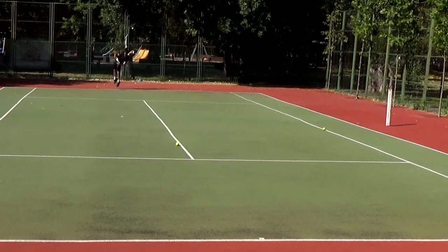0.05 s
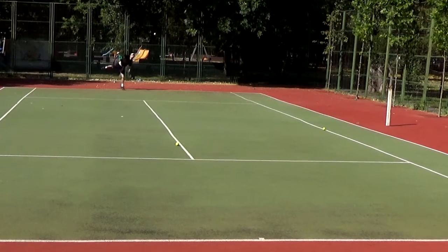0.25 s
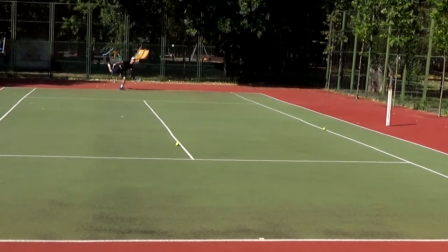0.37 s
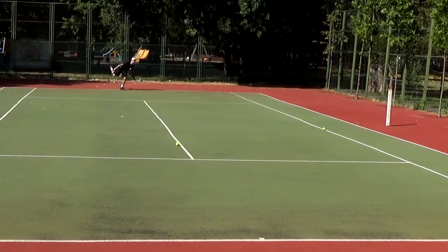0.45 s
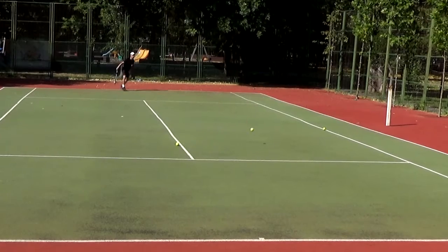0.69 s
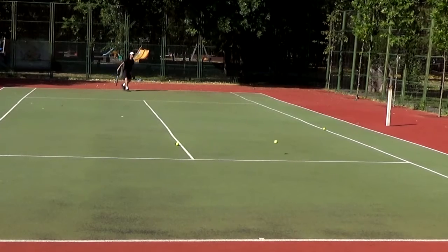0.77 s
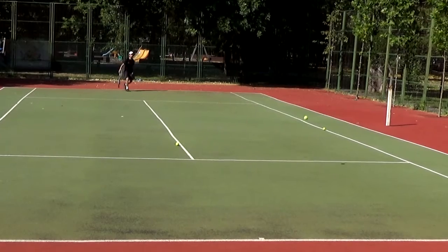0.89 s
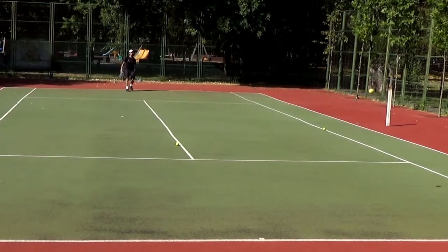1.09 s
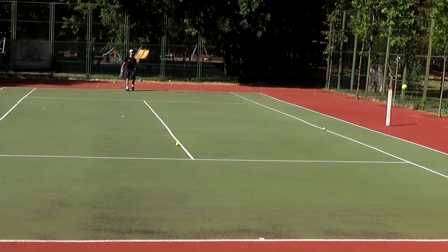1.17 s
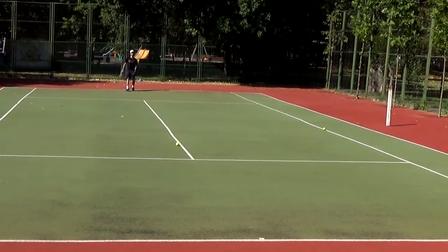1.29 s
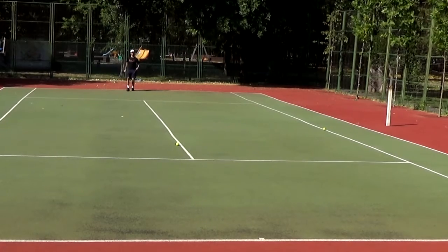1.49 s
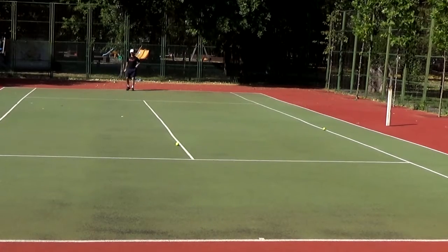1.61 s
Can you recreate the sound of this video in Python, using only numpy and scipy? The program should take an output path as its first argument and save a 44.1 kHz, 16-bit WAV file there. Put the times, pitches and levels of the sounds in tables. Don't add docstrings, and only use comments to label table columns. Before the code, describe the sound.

A tennis serve: at about 0.2 seconds a racket strikes the ball at the far end of an outdoor hard court, a sharp crack with a brief hollow pock. Fence slaps and lumpy tree echoes fade over the next half second. Near 0.85 seconds the ball bounces, a much quieter dull thump with a tiny scuff. Steady, wide leaf hiss runs throughout, to about 1.5 seconds, on a stereo camera microphone.

```python
import sys
import numpy as np
from scipy import signal
from scipy.fft import rfft, irfft
from scipy.io import wavfile
from scipy.ndimage import uniform_filter1d

SR = 44100
rng = np.random.default_rng(int(sys.argv[2]) if len(sys.argv) > 2 else 0)


def makeup_ratio(level_db):
    decades = np.asarray(level_db, float) / 20
    return 10 ** decades


def persist_wave(psi):
    counts = np.round(np.clip(psi, -1, 1) * 32767).astype(np.int16)
    wavfile.write(sys.argv[1], SR, np.atleast_2d(counts).T)


N = 72765

SERVE_S, BOUNCE_S = 0.2187, 0.8538


def read(table, hz):
    table = np.array(table, float)
    return np.interp(np.log(np.maximum(hz, 1)), np.log(table[:, 0]), table[:, 1])


def colour(x, table, share=1):
    hz = np.arange(N // 2 + 1) * SR / N
    return irfft(rfft(x) * makeup_ratio(share * read(table, hz)), N)


def coloured_noise(table):
    noise = colour(rng.standard_normal(N), table)
    return noise / np.sqrt(np.mean(noise ** 2))


def shape(start_s, rise_s, hold_s, t60_s):
    t = np.arange(N) / SR - start_s
    fall_db = -60 * np.clip(t - rise_s - hold_s, 0, 1) / t60_s
    return np.clip(t / rise_s, 0, 1) * makeup_ratio(fall_db)


def ring(start_s, modes):
    t = np.arange(N) / SR - start_s
    out = 0
    for pitch_hz, level_db, t60_s, late_s in modes:
        tone = np.sin(2 * np.pi * pitch_hz * (t - late_s))
        out = out + makeup_ratio(level_db) * tone * shape(start_s + late_s, 0.00043, 0, t60_s)
    return out


def walk(rate_hz):
    k = int(SR / rate_hz)
    steps = np.repeat(rng.standard_normal(N // k + 1), k)
    return 1.14 * uniform_filter1d(uniform_filter1d(steps, k), k)[:N]


def crack():
    snap_colour = [(200, -16), (600, 6), (2300, 3.5), (3500, 0), (4600, 5), (5600, 1), (10500, -1.5),
                   (16000, -23)]
    rasp_colour = [(400, 3), (1500, 7), (3500, 1.5), (6500, -2.5), (9000, -12), (16000, -47)]
    snap = makeup_ratio(-30) * coloured_noise(snap_colour) * shape(SERVE_S, 0.0002, 0.0019, 0.004)
    rasp = makeup_ratio(-35.5) * coloured_noise(rasp_colour) * shape(SERVE_S + 0.00257, 0.00034, 0.0017, 0.025)
    return snap + rasp


def pock():
    racket = [(300, -37.5, 0.012, 0.00098), (487, -33, 0.016, 0.00095), (750, -35, 0.014, 0.00162),
              (960, -31, 0.018, 0.011), (1840, -40, 0.06, 0.0095), (1210, -32.5, 0.021, 0.00294),
              (1600, -32, 0.016, 0.0026), (1990, -33, 0.014, 0.0024), (3030, -39, .02, .001),
              (4700, -36, .012, .0005), (5700, -39, .01, .0004), (7100, -40, .012, .0003),
              (10400, -39, .005, .0006)]
    pitch_hz, sag_hz_per_s = 993, 12800
    start_s = SERVE_S + 0.00202
    t = np.arange(N) / SR - start_s
    tone = np.sin(2 * np.pi * (pitch_hz - sag_hz_per_s * t / 2) * t)
    swell = shape(start_s, 0.0045, 0.0018, 0.005)
    return makeup_ratio(-21.5) * tone * swell + ring(SERVE_S, racket)


def bounce():
    squash_modes = [
        (278, -33.5, 0.02, 0.00087),
        (1000, -36.5, 0.045, 0.00025),
        (580, -43, 0.013, 0.000065),
        (1160, -42, 0.027, 0.00037),
        (2100, -44, 0.018, 0.0013),
    ]
    scuff_colour = [(1500, -10), (4000, -6), (6500, 13), (8500, 4), (10300, 8), (12500, -6), (16000, -25)]
    scuff = makeup_ratio(-47.5) * coloured_noise(scuff_colour) * shape(BOUNCE_S + 0.00051, 0.00044, 0.001, 0.005)
    squash = ring(BOUNCE_S, squash_modes[:1]) - ring(BOUNCE_S, squash_modes[1:])
    return squash + scuff


def fence_slaps(snap):
    slaps = [
        (.0502, -23),
        (.0600, -21),
        (.0862, -14),
    ]
    fence = [(1500, -1.5), (5000, -2), (8700, -3.5), (10000, -6), (13000, -16)]
    copies = sum(makeup_ratio(level_db) * np.roll(snap, int(late_s * SR)) for late_s, level_db in slaps)
    return colour(copies, fence)


def returns():
    reflections = [(.235, 860, -44, .004), (.243, 1010, -45, .006), (.251, 900, -41, .005),
                   (.260, 960, -43, .005), (.271, 1020, -45, .005), (.277, 890, -43, .004),
                   (.285, 720, -46, .004), (.298, 950, -45, .005), (.311, 600, -47, .004),
                   (.316, 760, -48, .004), (.347, 870, -50, .005), (.239, 1880, -48, .004)]
    sag = 0.04
    out = 0
    for at_s, pitch_hz, level_db, length_s in reflections:
        t = np.arange(N) / SR - at_s
        swell = np.cos(np.pi * np.clip(t / (2 * length_s), -0.5, 0.5)) ** 2
        tone = np.sin(2 * np.pi * pitch_hz * t * (1 - sag * t / (4 * length_s)))
        out = out + makeup_ratio(level_db) * swell * tone
    return out


def blurred():
    blur = [(250, -6), (550, 1), (1000, 6), (1400, -11), (4200, -9), (7000, -15), (12000, -32)]
    click = 1.0 * (np.arange(N) == int(SERVE_S * SR))
    clap = colour(click, blur)
    return makeup_ratio(-6) * clap / np.sqrt(np.sum(clap ** 2))


def scatter(x):
    foliage = [(200, -8.5), (650, 0), (950, -2), (1900, 6), (3300, 5), (4000, 2), (7000, 2), (12000, 0)]
    lumps = makeup_ratio(3 * walk(123))
    paths = rng.standard_normal(N) * lumps * shape(0.0057, 0.0061, 0.015, 0.74)
    paths = paths / np.sqrt(np.sum(paths ** 2))
    echoes = irfft(rfft(x) * rfft(paths), N)
    return makeup_ratio(-12.5) * colour(echoes, foliage)


def wind():
    hiss = [(18, -47), (30, -20), (108, -10.5), (410, -2.5), (455, -2), (1470, -2), (3400, -5.5),
            (7650, -11.5), (15500, -35.5)]
    body = [
        (773, 510, 2.5),
        (1330, 190, -2.5),
        (3670, 290, 2.5),
        (6660, 1260, -4),
    ]
    stereo_width = [(60, -27), (110, -32), (200, -20), (380, -18), (700, -13.5), (1290, -8), (2380, -9),
                    (4400, -10), (8120, -7.5), (10500, -11), (15000, -22)]
    hz = np.maximum(np.arange(N // 2 + 1) * SR / N, 1)
    bumps_db = sum(db * np.exp(-((hz - centre) / spread) ** 2) for centre, spread, db in body)
    mid_gain = makeup_ratio(read(hiss, hz) + bumps_db)
    gain = mid_gain * np.array([np.ones(len(hz)), makeup_ratio(read(stereo_width, hz))])
    noise = rfft(rng.standard_normal((2, N))) * gain
    swell_db = 0.07 * walk(2.4)
    place = 2 * np.log2(hz / 20)
    out = 0
    for k in range(21):
        band = np.cos(np.pi / 2 * np.clip(place - k, -1, 1)) ** 2
        flicker_db = 0.91 * walk(14.3)
        out = out + irfft(noise * band, N) * makeup_ratio(swell_db + flicker_db)
    return out * makeup_ratio(-50) / np.sqrt(np.mean(out[0] ** 2))


def scene():
    small = [(40, -50), (110, -35), (200, -7), (280, 0), (1250, 0), (1400, -5.5), (1550, 0)]
    lean = [(400, -28), (950, -16.5), (2000, -22), (7000, -28), (12000, -34)]
    ports = [(100, 0.5), (500, 0.1), (1000, 0.2), (1700, 0.5), (2500, -2), (4500, -2), (8000, -2),
             (12000, -1.5)]
    snap = crack()
    blows = colour(snap + pock() + bounce(), small)
    far = makeup_ratio(-5) * blows + blurred()
    mid, side = wind()
    mid = mid + blows + fence_slaps(snap) + returns() + scatter(far)
    side = side + colour(blows, lean) + makeup_ratio(-17) * returns() + makeup_ratio(-8) * scatter(far)
    left = colour(mid + side, ports, 0.42)
    right = colour(mid - side, ports, -0.77)
    return np.array([left, right])


def low_pass(x):
    return signal.sosfilt(signal.butter(12, 15700, fs=SR, output="sos"), x)


def record(dry):
    top_cut = signal.ellip(8, 0.2, 60, 15500, fs=SR, output="sos")
    mix = signal.sosfilt(top_cut, dry)
    return low_pass(mix)


dry = scene()
out = record(dry)
persist_wave(out)
```